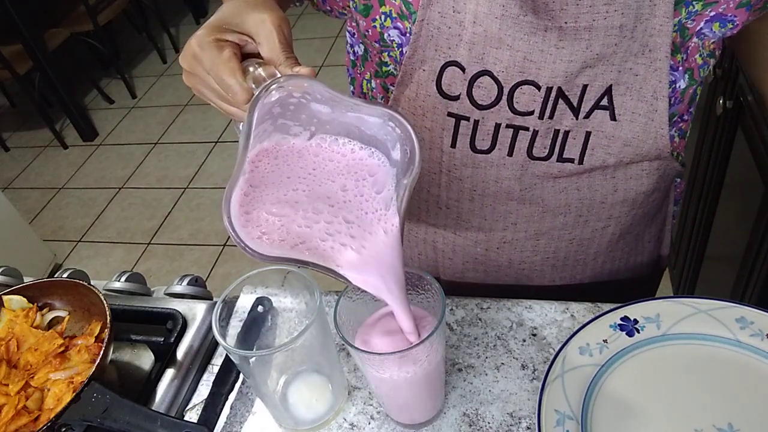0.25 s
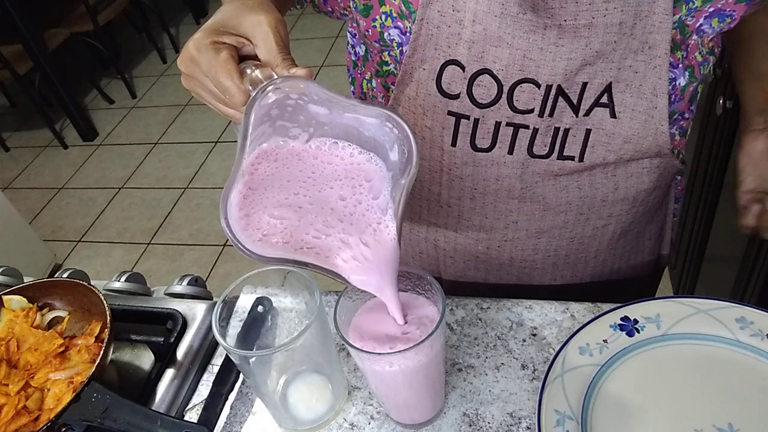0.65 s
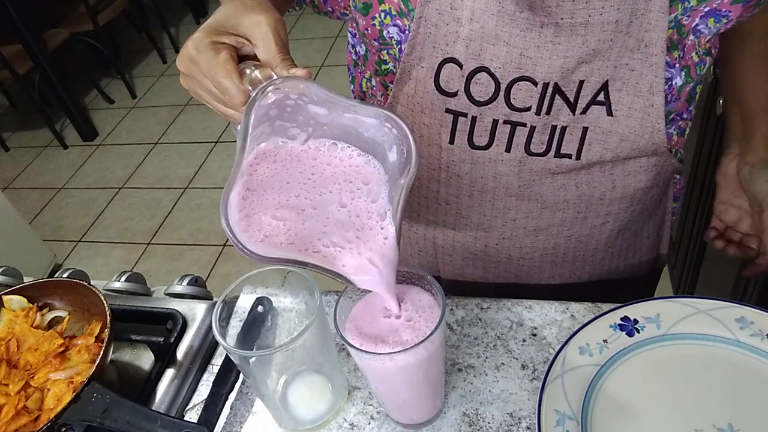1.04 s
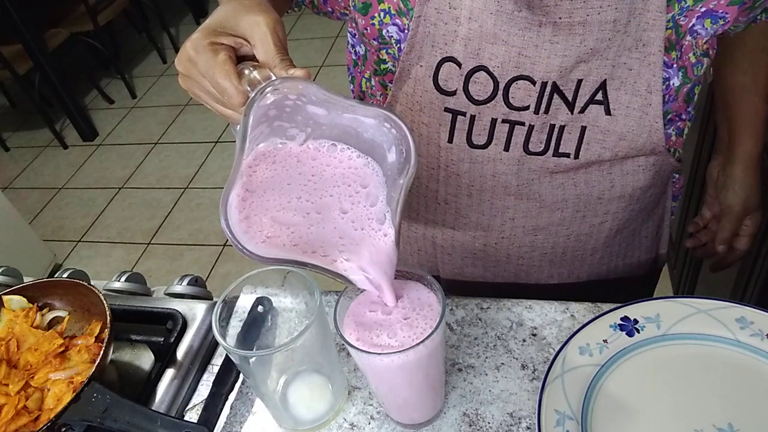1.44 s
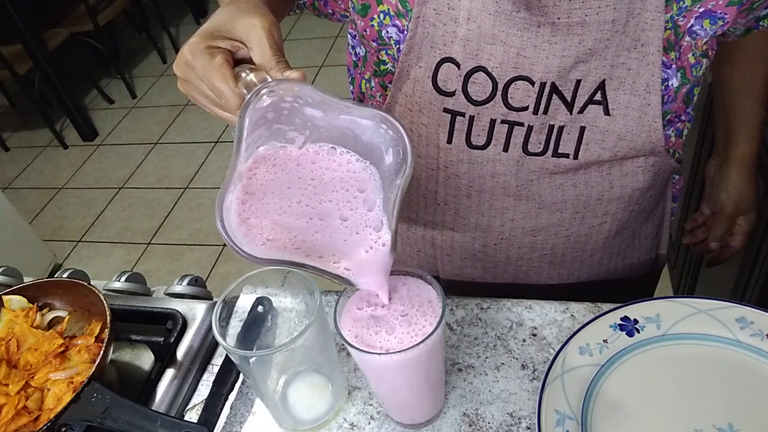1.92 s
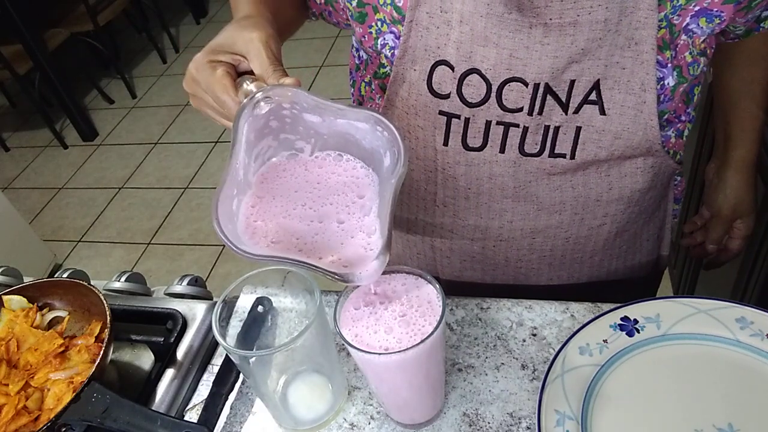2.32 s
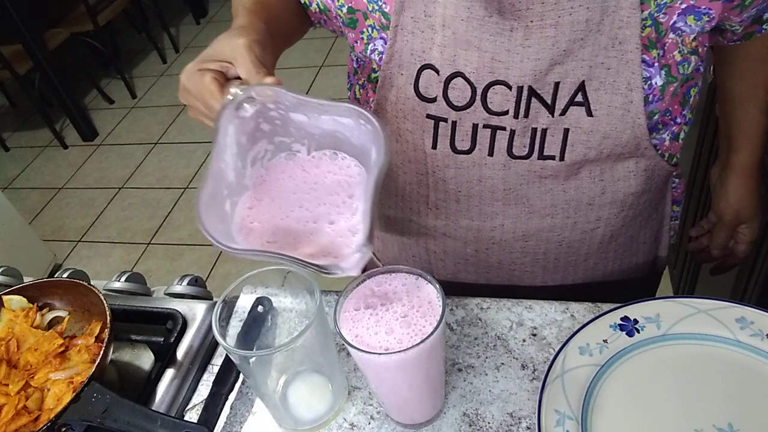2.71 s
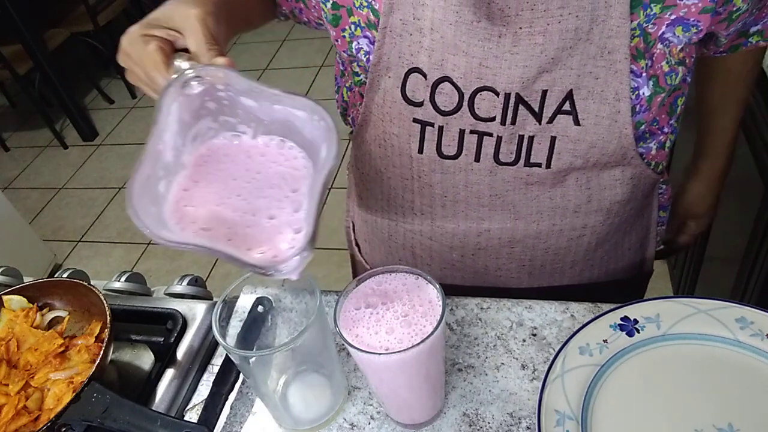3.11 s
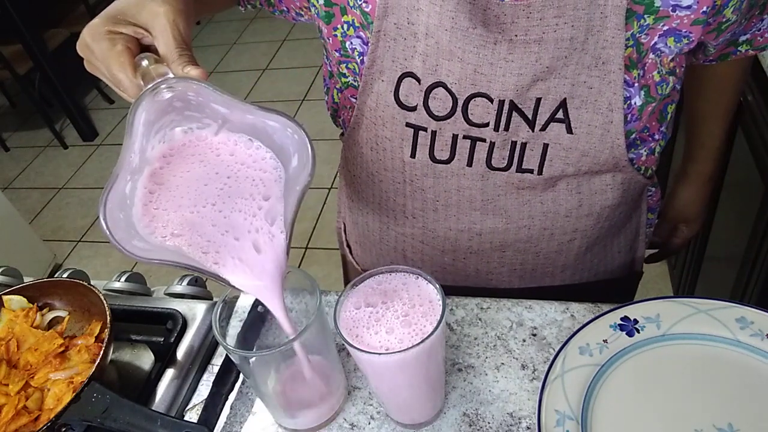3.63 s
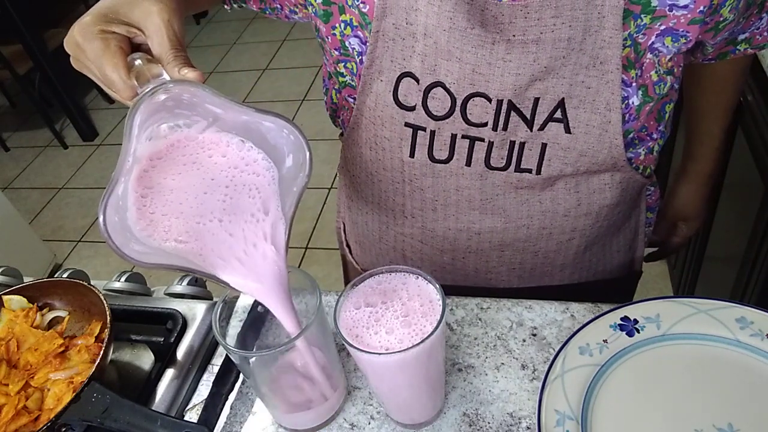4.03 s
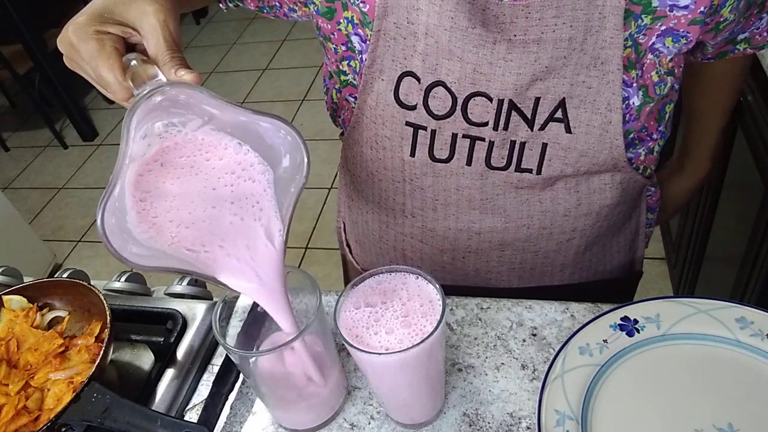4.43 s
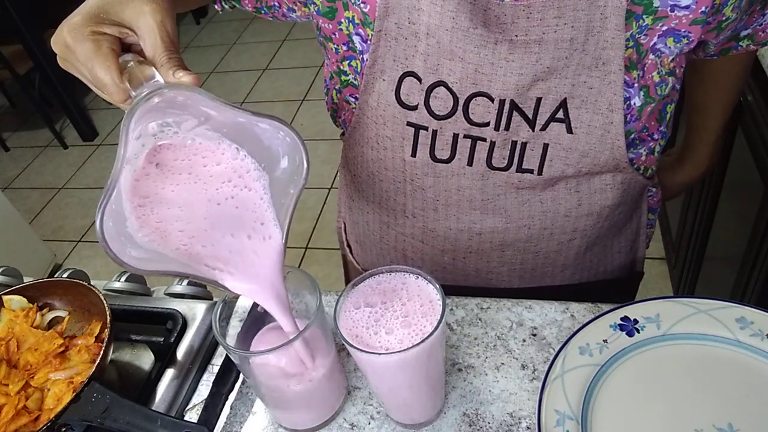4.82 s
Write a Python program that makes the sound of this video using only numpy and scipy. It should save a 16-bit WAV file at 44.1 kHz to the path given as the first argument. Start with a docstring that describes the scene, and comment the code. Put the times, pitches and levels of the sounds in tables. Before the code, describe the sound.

A thick milkshake slides almost silently from a blender jar into a glass, its foam crackling faintly over a quiet, high ticking. The spout knocks dully on the rim, bumps a few more times and knocks again. Then gobs plop and click into an empty second glass and the soft pour continues. The microphone is close, in a kitchen where appliance motors hum low throughout.

```python
"""A humming kitchen, a stereo microphone close to a blender jar and two glasses. From the start a thick
milkshake slides almost silently into the first glass; foam crackles faintly over a quiet, regular
ticking. From 2.1 s the spout knocks on the rim, slides along it and slips off with a tiny ping. At 3.7 s
the first gobs plop and click in the empty second glass. Behind it all, appliance motors drone and beat
against each other."""
import sys
import numpy as np
from scipy import signal
from scipy.fft import rfft, irfft, next_fast_len
from scipy.io import wavfile

SR = 44100
rng = np.random.default_rng(int(sys.argv[2]) if len(sys.argv) > 2 else 0)


def inscribe(sig):
    """Save sig as 16-bit PCM at rate SR to the path in sys.argv[1].

    A 1-D sig is mono; a 2-D sig holds one channel per row.
    Samples are clipped to [-1, 1] before scaling.
    """
    pcm = np.round(np.clip(np.atleast_2d(sig).T, -1, 1) * 32767)
    wavfile.write(sys.argv[1], SR, pcm.astype(np.int16))


N = 222925
T = np.arange(N) / SR

# strength of the pour: (time [s], relative level [dB])
POUR_FLOW = [(0, -59), (.3, -59.5), (.8, -61.5), (1.4, -62), (2, -64.5), (2.6, -62), (3.1, -60),
             (3.45, -63.5), (3.7, -58), (3.95, -59.5), (4.2, -62.5), (4.6, -62.5), (5.05, -63)]
# rush of the thick stream: (frequency [Hz], relative level [dB])
STREAM_SPECTRUM = [(200, -10), (400, 0.5), (750, 3), (1100, -5), (2200, -11.5), (4000, -23.5), (15000, -31)]
# air singing above the drink: (peak time [s], fade [s], pitch [Hz], glide [octaves/s], level [dB])
AIR_WHISTLES = [(0.018, 0.25, 905, -0.41, -62), (1.03, 0.094, 975, 0.014, -69.5),
                (4.06, 0.039, 1000, 0.038, -63)]
# spout on rim: (time [s], jar level [dB], glass level [dB], thud level [dB], softness cut-off [Hz])
SPOUT_KNOCKS = [(2.1088, -38.5, -39.5, -20, 1510), (2.1116, -47, -39, -20, 7000),
                (2.181, -49.5, -53, -31, 2370), (2.389, -73, -59, -49, 1300), (2.7933, -61, -54, -54, 1500),
                (2.8336, -55, -48.5, -37, 2080), (2.881, -59, -54.5, -38, 2100),
                (3.4002, -49.5, -59, -22.5, 3200)]
# jar and glass: (frequency [Hz], relative level [dB], t60 [s], phase between microphones [rad])
JAR_MODES = [(260, -3, 0.09, 0.42), (330, -3.5, 0.031, 0.35), (522, -1, 0.09, 0.4), (590, -3.5, 0.14, 1),
             (846, -10, .05, 0.9), (1030, -10, 0.044, 0.73), (1135, -2.5, 0.06, 0.87),
             (1960, -20, 0.24, 1.6)]
GLASS_MODES = [(1231, 2, 0.033, 1.5), (1291, 3.5, 0.04, 0.87), (2047, -8, 0.08, 2),
               (2153, -5.5, 0.065, 1.73), (2575, -4.5, 0.05, 1.8), (3580, -25, 0.13, 2.25),
               (4953, -24, 0.07, 1.6), (5840, -25, 0.06, 1.7), (7960, -27, .06, 1.8)]
# thud of the full jar: (frequency [Hz], relative level [dB])
THUD_SPECTRUM = [(120, -21), (260, -3), (380, -1.5), (560, 0.5), (900, -9), (1500, -25), (3000, -33),
                 (8000, -56)]
# thin glassy ring of the rim: (frequency [Hz], relative level [dB])
RIM_MODES = [(5857, 0), (7838, -14), (8527, -18), (11843, -6), (13178, -7), (14470, -15)]
# heavy gobs landing in the empty glass: (time [s], relative level [dB])
GOB_LANDINGS = [(3.694, -52), (3.7148, -40), (3.729, -40), (3.809, -57), (3.917, -63)]
# wet clicks, bubble pops and the click of the spout slipping off the rim: (time [s], ring pitch [Hz],
# ring level [dB], relative splat level [dB], relative spray level [dB], spray tilt [dB/octave])
CLICK_EVENTS = [(.177, 1270, -52, -62, -68, -4), (0.23, 1280, -60, -65, -72, -2),
                (1.551, 1800, -77, -67, -55, 0), (3.0995, 2240, -63, -57, -59, -2),
                (3.6689, 4360, -54.5, -49.5, -39, -5), (3.682, 12600, -54, -65, -30, 4.5),
                (3.7186, 1750, -56, -57, -72, 3), (3.736, 1855, -50.5, -44.5, -68, 1),
                (3.806, 1323, -46.5, -47, -63, -8), (3.8671, 1740, -61, -46, -57, -3),
                (3.9024, 1780, -39.5, -38, -37, -6.5), (3.915, 1330, -48, -50, -70, -4),
                (3.949, 1740, -58, -44.5, -52.5, -9.5), (4.1321, 1980, -60.5, -49.5, -60, -2),
                (4.189, 1860, -69, -57, -55, -6), (4.281, 1810, -64, -58, -55, -5),
                (4.3227, 705, -46.5, -53, -63, -1), (4.521, 826, -36.5, -37, -32.5, -6),
                (4.6836, 2660, -60, -46.5, -47, -2.5)]
# dull plop, wet splat, fine spray and high tick: (frequency [Hz], relative level [dB])
PLOP_SPECTRUM = [(80, -24), (150, 3.5), (270, 7), (350, 3), (450, -25), (600, -9), (800, -37), (3000, -52)]
SPLAT_SPECTRUM = [(300, 1), (480, -21), (650, 11.5), (850, -13), (1020, -4.5), (1220, 9.5), (1450, 2.5),
                  (1650, -1.5), (1830, 3.5), (2100, -3), (2600, -0.5), (3300, -9.5), (5300, -12.5),
                  (7000, -18), (16000, -36)]
SPRAY_SPECTRUM = [(500, -25), (2500, -8.5), (4300, -9), (6000, -5), (8000, -6), (11500, 1), (14000, -1),
                  (16000, 2.5)]
TICK_SPECTRUM = [(1000, -28), (9000, -20), (10500, -9), (12200, -5), (13500, -23), (16000, -15.5)]
# decay of the tiled room: (frequency [Hz], t60 [s])
ROOM_DECAY = [(200, 0.99), (1000, 0.67), (4000, 0.46), (14000, 0.45)]
# the fan-like tone and the main tone of the throbbing motor pair: (time [s], level [dB])
FAN_LEVEL = [(0, -53.5), (.68, -53.5), (.82, -49.5), (.98, -54.5), (1.58, -53.5), (1.76, -61), (1.95, -58),
             (2.2, -52), (2.6, -55.5), (3.03, -54), (3.3, -59.5), (3.75, -48.5), (3.92, -54.5), (4.2, -53),
             (5.05, -57)]
THROB_LEVEL = [(0, -56.5), (1.6, -59.5), (2.25, -63.5), (2.58, -53.5), (2.9, -56.5), (3.7, -57.5),
               (4.3, -68), (4.6, -54.5), (5.05, -58.5)]
# slowly beating motor pairs: (pitch [Hz], partner offset [dB], swell delay [s], left minus right [dB])
MOTOR_PAIRS = [(58, -5, 0.026, 3.6), (295.2, -3, -.04, -1)]
# the motors meet in step and the hum swells: (time [s], low pair level [dB], high pair level [dB])
MOTOR_SWELLS = [(-.3, -64, -57), (.46, -60, -64), (1.25, -58, -65.5), (2.09, -59.5, -68),
                (3.03, -59.5, -63.5), (3.9, -65.5, -63.5), (4.6, -61.5, -65), (5.35, -66, -65)]
# steady motor tones: (pitch [Hz], level [dB], left minus right [dB])
MOTOR_TONES = [(30.2, -83, 1.5), (86.9, -68, 5.5), (138.4, -64.5, -3.5), (174.5, -69.5, 9),
               (196.7, -59.5, 2.5), (218.3, -63, 5), (345.6, -75, -2.5), (541, -80, 3.5),
               (694.4, -77.5, -6)]
# room tone: (frequency [Hz], relative level [dB])
ROOM_TONE_SPECTRUM = [(20, -24.5), (50, -17), (90, -8.5), (150, -2.5), (210, -8.5), (310, -9.5),
                      (430, -17.5), (700, -24.5), (1050, -29.5), (1340, -28), (2200, -34.5), (3300, -39),
                      (5000, -43), (7000, -50), (9000, -49), (11500, -44.5), (15500, -44.5)]
# likeness of diffuse sound at the two microphones: (frequency [Hz], correlation [0-1])
MIC_COHERENCE = [(60, 1), (150, 0.81), (380, 0.6), (950, 0), (15000, 0)]


def stream(rush_db=-5, lumps_db=2.0, gurgle_db=-12):
    """Close up, thick liquid folds into foam: a soft lumpy rush with small bubbles."""
    flow_db, = curves(POUR_FLOW)
    rush = diffuse_noise(STREAM_SPECTRUM) * amp(rush_db + lumps_db * wander(25))
    return amp(flow_db) * (rush + amp(gurgle_db) * gurgle())


def gurgle(bubbles_per_s=70, ring_cycles=3.3, low_hz=550, high_hz=1400, sizes=14):
    """Small bubbles dragged under by the stream; the thick drink stops each within a few cycles."""
    out, t = np.zeros((2, N)), np.arange(SR // 16) / SR
    for hz in np.geomspace(low_hz, high_hz, sizes):
        births = (rng.random(N) < bubbles_per_s / sizes / SR) * low_hz / hz
        ring = np.exp(-hz * t / ring_cycles) * np.sin(2 * np.pi * hz * t + rng.standard_normal((2, 1)))
        out += signal.oaconvolve(births[None], ring, axes=1)[:, :N]
    return unit_rms(out)


def whistles(width_hz=65):
    """The stream stirs a fuzzy resonance in the air of the glass, which swells and fades."""
    out = np.zeros((2, N))
    for peak_s, fade_s, hz, glide, db in AIR_WHISTLES:
        pitch = hz * 2 ** (glide * np.clip(T - peak_s, -1, 1))
        envelope = amp(db) * np.exp(-abs(T - peak_s) / fade_s)
        out += envelope * np.array([resonance(pitch, width_hz) for _ in range(2)])
    return out


def spout_knocks():
    """The spout bumps the rim: the full jar thuds, and both jar and glass ring briefly."""
    rings, thuds = np.zeros((2, 2, N))
    for s, jar_db, glass_db, thud_db, soft_hz in SPOUT_KNOCKS:
        add(rings, s, amp(jar_db) * struck(JAR_MODES, soft_hz))
        add(rings, s, amp(glass_db) * struck(GLASS_MODES, soft_hz))
        add(thuds, s, amp(thud_db) * burst(decay_s=0.013, snap=2.7)[0])
    return rings + colour(thuds, THUD_SPECTRUM)


def struck(modes, soft_hz, rise_s=0.00049):
    """The dying modes of one body; a soft contact leaves the high ones quiet."""
    t = np.arange(SR // 3) / SR
    hz, db, t60, phase = np.transpose(modes)[:, :, None]
    envelope = amp(db - 60 * t / t60) * (1 - np.exp(-t / rise_s))
    polarity = (-1) ** np.arange(len(modes))[:, None]  # neighbouring modes swing against each other
    swing = polarity * envelope / np.sqrt(1 + (hz / soft_hz) ** 4)
    return np.array([(swing * np.sin(2 * np.pi * hz * t + side * phase)).sum(0) for side in (.5, -.5)])


def rim_ring(peak_s=3.06, peak_db=-80.5, slip_s=3.102, slip_db=-67, slip_t60_s=0.07):
    """The wet spout slides ever harder along the rim, which sings thinly and pings as it slips off."""
    slide_db = peak_db - np.maximum(47 * (peak_s - T), 57 * (T - peak_s))  # rise and fall in dB/s
    ping = (T > slip_s) * amp(slip_db - 60 * abs(T - slip_s) / slip_t60_s)
    ring = np.array([sum(amp(db) * resonance(hz, width_hz=45) for hz, db in RIM_MODES) for _ in range(2)])
    return (amp(slide_db) + ping) * unit_rms(ring)


def plops(gain_db=24):
    """The first gobs thud onto the bottom of the empty glass, damped by the thick drink."""
    impacts = np.zeros((2, N))
    for s, db in GOB_LANDINGS:
        add(impacts, s, amp(db + gain_db) * burst(decay_s=0.0076, snap=35)[0])
    return colour(impacts, PLOP_SPECTRUM)


def clicks(splat_gain_db=14, spray_gain_db=12, ring_decay_s=0.004, mic_phase_rad=0.43):
    """Gobs land, bubbles pop and the spout slips off the rim: each a brief ring, a splat and a spray."""
    out, t = np.zeros((2, N)), np.arange(SR // 10) / SR
    phase = np.array([[0], [mic_phase_rad]])
    for s, hz, ring_db, splat_db, spray_db, tilt_db in CLICK_EVENTS:
        # in gobs and bubbles, the ring is a pocket of air
        envelope = (1 - np.exp(-2 * hz * t)) * np.exp(-t / ring_decay_s)
        add(out, s, amp(ring_db) * envelope * np.sin(2 * np.pi * hz * t + phase))
        add(out, s, amp(splat_db + splat_gain_db) * colour(burst(decay_s=0.0054), SPLAT_SPECTRUM))
        tilted = [(f, db + tilt_db * np.log2(f / SPRAY_SPECTRUM[0][0])) for f, db in SPRAY_SPECTRUM]
        add(out, s, amp(spray_db + spray_gain_db) * colour(burst(decay_s=0.0047), tilted))
    return out


def foam(pops_per_s=80, offset_db=-3, spread_db=2.4):
    """Tiny foam bubbles pop at random, louder when the flow is stronger."""
    flow_db, = curves(POUR_FLOW)
    pops = rng.random(N) < pops_per_s / SR
    pop_db = flow_db + offset_db + spread_db * np.minimum(rng.exponential(1, (2, N)), 3)
    return colour(pops * amp(pop_db), SPRAY_SPECTRUM)


def ticking(start_s=0.059, every_s=0.1375, jitter_s=0.005, db=-51.5, spread_db=3):
    """Faint, high, nearly regular ticks, about seven a second."""
    ticks = np.zeros((2, N))
    for k, (late, weak) in enumerate(rng.standard_normal((36, 2))):
        s = abs(start_s + k * every_s + jitter_s * late)
        add(ticks, s, amp(db - spread_db * weak) * burst(decay_s=0.0046, snap=2.9))
    return colour(ticks, TICK_SPECTRUM)


def kitchen_reverb(x, gap_s=0.0011):
    """Dense reflections come back off the tiles, each band dying at its own speed."""
    reflections = rng.standard_normal((2, SR // 2)) * (np.arange(SR // 2) > gap_s * SR)
    hz, t, bands = signal.stft(reflections, SR, nperseg=256)
    decay = amp(-60 * t / at_hz(ROOM_DECAY, hz)[:, None])
    tail = signal.istft(bands * decay, SR, nperseg=256)[1]
    return signal.fftconvolve(x, tail / np.linalg.norm(tail[0]), axes=1)[:, :N]


def fan(hz=147, flutter_db=1.93):
    """The strongest tone of the hum, unsteady and fan-like, a little left of centre."""
    level_db, = curves(FAN_LEVEL)
    drone = motor_tone(hz * T + rng.random(), level_db + flutter_db * wander(4), waver_rad=0.7)
    return pan(drone, 2.2)


def motors(throb_hz=116, throbs_per_s=2.06, crest_s=2.571):
    """Appliances in the background: one pair of tones throbs evenly, two beat slowly, the rest waver."""
    throb_db, = curves(THROB_LEVEL)
    hum = pan(beating(throb_hz, throb_db, partner_db=-6.5, beats=throbs_per_s * (T - crest_s)), 0.5)
    swell_times = np.transpose(MOTOR_SWELLS)[0]
    for (hz, partner_db, delay_s, pan_db), swell_db in zip(MOTOR_PAIRS, curves(MOTOR_SWELLS)):
        beats = np.interp(T - delay_s, swell_times, np.arange(len(swell_times)))
        hum += pan(beating(hz, swell_db, partner_db, beats), pan_db)
    for hz, db, pan_db in MOTOR_TONES:
        hum += pan(motor_tone(hz * T + rng.random(), db, waver_rad=0.16), pan_db)
    return hum


def beating(hz, db, partner_db, beats):
    """A motor and a slightly faster partner, in step whenever the count of beats is whole."""
    turns = hz * T + rng.random()
    partner = motor_tone(turns + beats, db + partner_db, waver_rad=0.37)
    return motor_tone(turns, db, waver_rad=0.26) + partner


def motor_tone(turns, db, waver_rad):
    """A tone of the given rms level whose phase wavers slowly."""
    return np.sqrt(2) * amp(db) * np.cos(2 * np.pi * turns + waver_rad * wander(3.7))


def diffuse_noise(spectrum):
    """Noise reaching both microphones, alike in the bass and independent in the treble."""
    hz = np.fft.rfftfreq(N, 1 / SR)
    left, independent = rfft(rng.standard_normal((2, N)))
    likeness = np.clip(at_hz(MIC_COHERENCE, hz), 0, 1)
    right = likeness * left + np.sqrt(1 - likeness ** 2) * independent
    return unit_rms(irfft(np.array([left, right]) * amp(at_hz(spectrum, hz)), N))


def burst(decay_s, snap=4.5, size=3000):
    """A snap and its quick scatter inside the glass, of unit energy at each microphone."""
    x = rng.standard_normal((2, size)) * np.exp(-np.arange(size) / SR / decay_s)
    x[:, 0] += snap
    return x / np.linalg.norm(x, axis=1, keepdims=True)


def resonance(hz, width_hz):
    """A narrow resonance kept ringing by noise."""
    phase = 2 * np.pi * np.cumsum(hz * np.ones(N)) / SR
    return unit_rms(wander(width_hz) * np.cos(phase) + wander(width_hz) * np.sin(phase))


def wander(rate_hz):
    """Slow random drift of unit rms."""
    size = next_fast_len(N)
    lowpass = 1 / (1 + (np.fft.rfftfreq(size, 1 / SR) / rate_hz) ** 4)
    return unit_rms(irfft(rfft(rng.standard_normal(size)) * lowpass, size)[:N])


def colour(x, spectrum, size=2048):
    """Minimum-phase filter with the given spectrum and unit energy."""
    log_gain = np.log(amp(at_hz(spectrum, abs(np.fft.fftfreq(size, 1 / SR)))))
    taps = np.fft.ifft(np.exp(np.conj(signal.hilbert(log_gain)))).real[:size // 2]
    return signal.oaconvolve(x, taps[None] / np.linalg.norm(taps), axes=1)[:, :N]


def at_hz(table, hz):
    """Reads a table on a log-frequency axis."""
    f, value = np.transpose(table)
    return np.interp(np.log(hz + 1), np.log(f + 1), value)


def curves(table):
    """The columns of a time table at every sample."""
    times, *columns = np.transpose(table)
    return [np.interp(T, times, column) for column in columns]


def add(mix, s, sound):
    """Lays a sound into the mix at time s."""
    part = mix[:, round(s * SR):][:, :sound.shape[-1]]
    part += sound[..., :part.shape[-1]]


def pan(x, pan_db):
    """Places a sound between the microphones, left minus right in dB."""
    return x * amp(pan_db * np.array([[.5], [-.5]]))


def amp(db):
    """Decibels to gain."""
    return 10 ** (np.asarray(db) / 20)


def unit_rms(x):
    """Scales to an rms of one."""
    return x / np.sqrt(np.mean(x ** 2) + 1e-20)


def scene(knock_reverb_db=-12, patter_reverb_db=-8, room_tone_db=-55.5):
    """Jar, glasses and drink close to the microphone, the hum and air of the kitchen behind."""
    knocks = spout_knocks()
    patter = clicks() + plops() + foam() + ticking()
    close = knocks + patter + rim_ring() + stream() + whistles()
    reverb = kitchen_reverb(amp(knock_reverb_db) * knocks + amp(patter_reverb_db) * patter)
    room_tone = amp(room_tone_db) * diffuse_noise(ROOM_TONE_SPECTRUM)
    return pan(close + reverb + room_tone, 0.77) + fan() + motors()


def record(dry, edge_hz=15850):
    """The recorder's band limit."""
    lowpass = signal.firwin(1023, edge_hz, window=("kaiser", 9), fs=SR)
    return signal.oaconvolve(dry, lowpass[None], "same")


dry = scene()
out = record(dry)
inscribe(out)
```